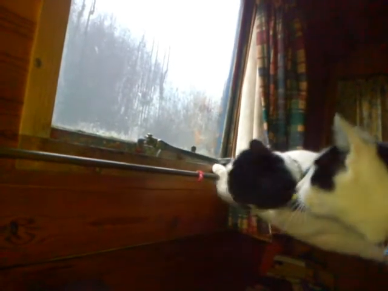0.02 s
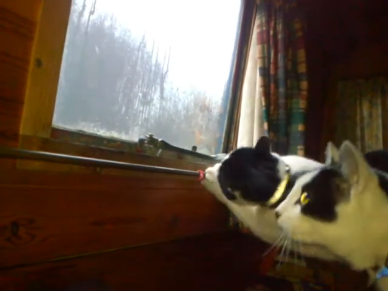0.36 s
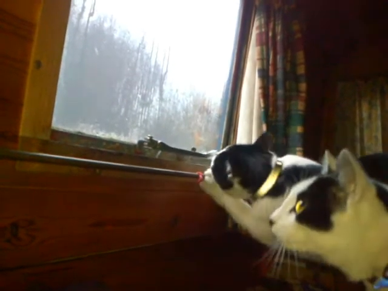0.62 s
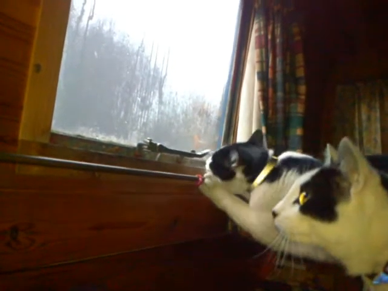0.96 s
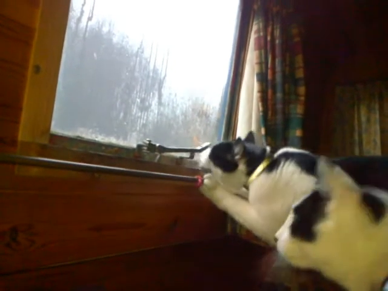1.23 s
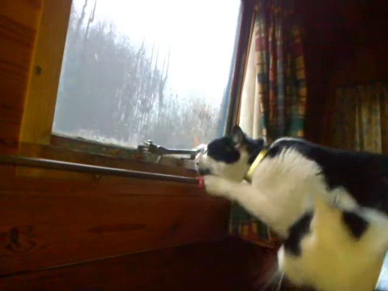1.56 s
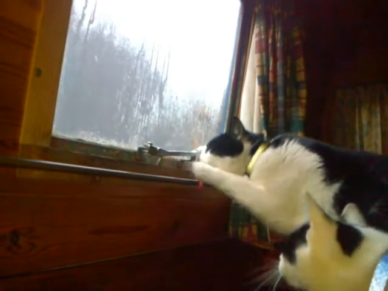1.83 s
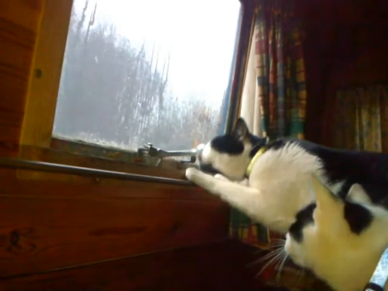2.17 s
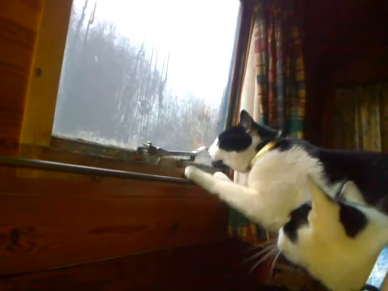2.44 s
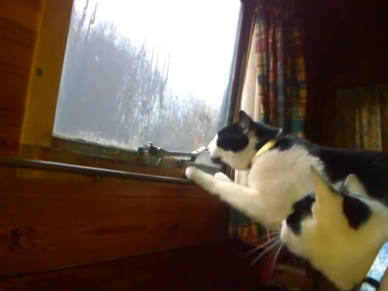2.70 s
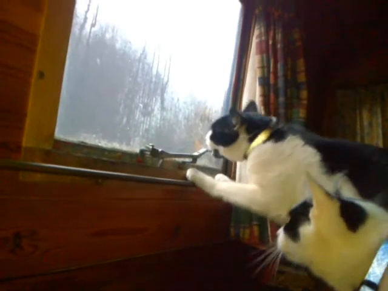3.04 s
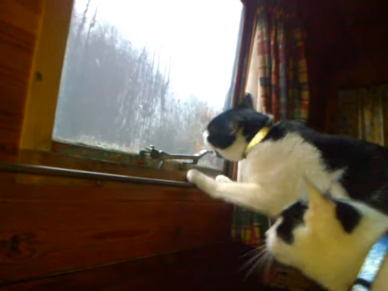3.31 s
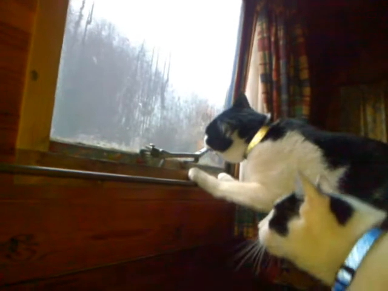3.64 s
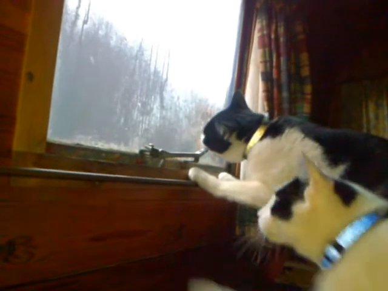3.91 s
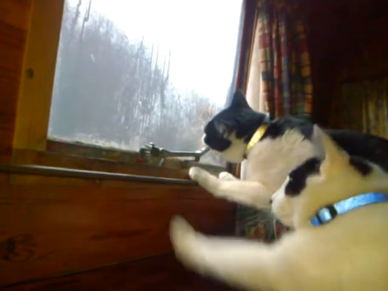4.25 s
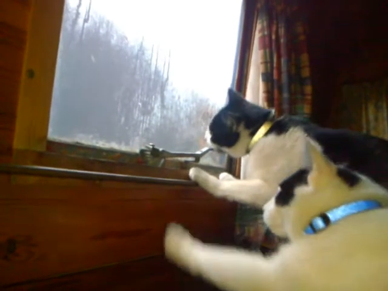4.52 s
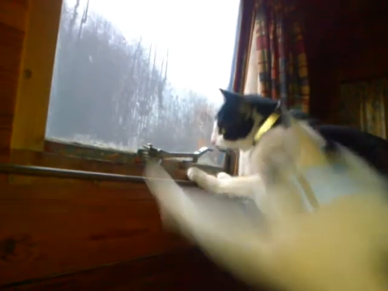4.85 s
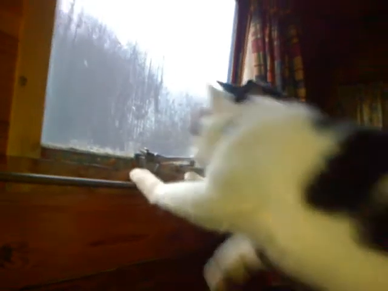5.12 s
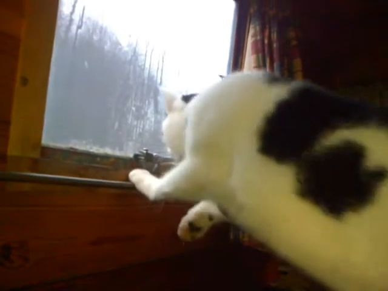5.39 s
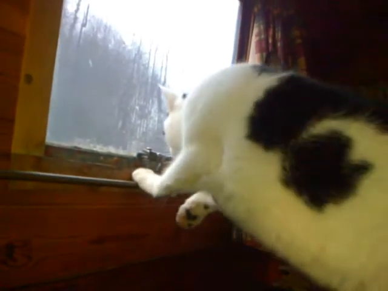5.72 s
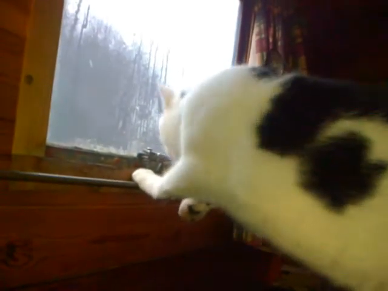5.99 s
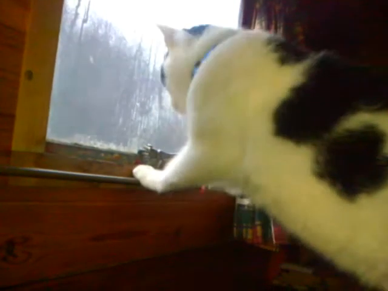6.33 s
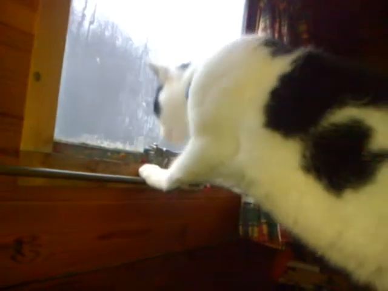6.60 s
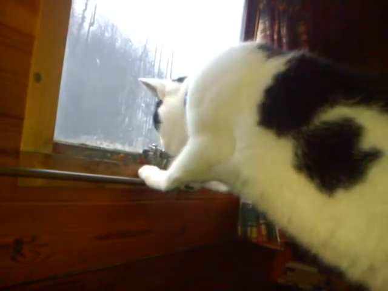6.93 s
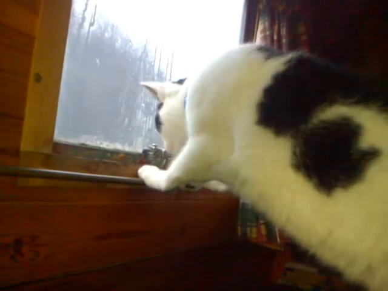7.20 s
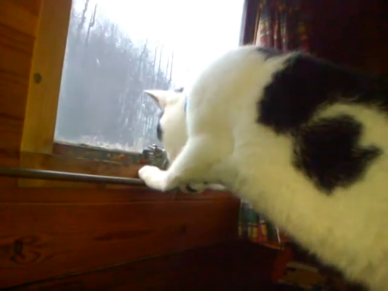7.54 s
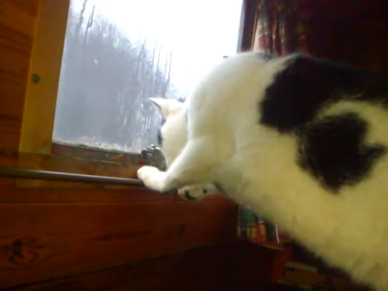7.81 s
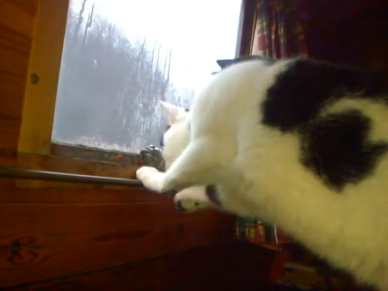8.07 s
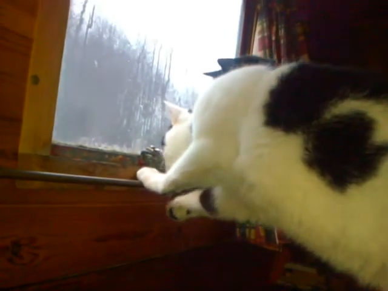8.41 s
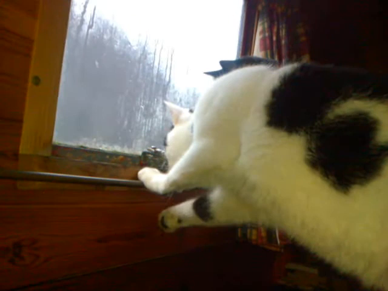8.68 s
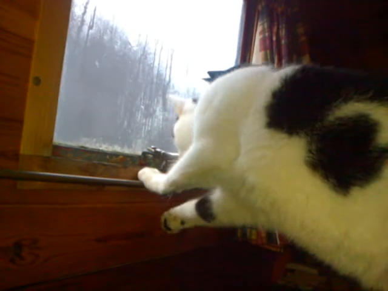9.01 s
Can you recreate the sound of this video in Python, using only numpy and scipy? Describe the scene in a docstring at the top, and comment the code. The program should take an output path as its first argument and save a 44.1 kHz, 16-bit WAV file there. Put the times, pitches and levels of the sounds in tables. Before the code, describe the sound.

Over the faint hiss and rumble of a small mono microphone, a metal window latch lifts, scrapes and drops on its peg several times as a cat paws it. The hardest clack crackles slightly. In a quieter stretch, paws bump the wooden sill and fur brushes the frame. Then the latch clatters once more with a dull wooden knock, followed by faint ticks. The room is small, with little echo.

```python
"""The metal stay of a wooden window, pawed by a cat in a small room.
The arm scrapes, lifts and clacks back on its peg, ringing latch, frame and pane; paws bump the sill.
Each blow is decaying sine modes plus noise bands; scrapes drive the same window with tiny slips.
The cat rustles as it shifts, and its fur brushes the frame once.
A small mono camera adds hiss and rumble; its gain sinks slowly after loud clacks, then recovers."""
import sys
import numpy as np
from scipy import signal
from scipy.fft import rfft, irfft
from scipy.io import wavfile
from scipy.ndimage import uniform_filter1d

SR = 44100
rng = np.random.default_rng(int(sys.argv[2]) if len(sys.argv) > 2 else 0)


def dump_mix(stems):
    """Bounce the given channels to the path in sys.argv[1] as a 16-bit WAV at rate SR."""
    frames = np.atleast_2d(stems).T  # one column per channel
    limited = np.clip(frames, -1, 1)  # hard clip at full scale
    pcm = np.round(limited * 32767).astype(np.int16)
    wavfile.write(sys.argv[1], SR, pcm)


N = 403515

# Noise spectra. Each row: frequency in Hz, relative density in dB.
HISS_SPECTRUM = [(20, -18), (100, -8), (230, -9), (800, -15.5), (1600, -20), (2800, -21.5), (3900, -19),
                 (5600, -19), (8000, -16), (11000, -13), (13500, -11.5), (15500, -12)]
RUMBLE_SPECTRUM = [(8, -9.5), (27, -1), (42, -4.5), (62, 1), (80, -9.5), (130, -10.5), (300, -50),
                   (1000, -70)]
RUSTLE_SPECTRUM = [(40, -1), (110, -4), (240, 2.5), (450, -2.5), (1200, -12), (3000, -16), (8000, -36)]
FUR_SPECTRUM = [(100, -26), (2800, -12), (4200, 6), (5200, 7), (7000, -12), (12000, -18)]
# The cat shifts, the camera follows. Each row: centre and half length in seconds, rustle and rumble in dB.
CAT_SHIFTS = [(0.497, 0.06, -51, -58), (2.75, 0.28, -56.5, -56), (4.3, 0.56, -60.5, -49.5),
              (4.97, 0.25, -50.5, -48), (6.3, 0.37, -61, -55), (6.75, 0.19, -52.5, -59),
              (7.85, 0.15, -57, -46)]
# Arm drops on its peg. Each row: start in seconds, level in dB, ring-time factor (small if held down),
# frame thud in dB, frequency favoured by the contact spot in Hz, first rebound gap in seconds,
# change per rebound in dB.
ARM_CLACKS = [(0.9233, -9.5, 0.66, -1.5, 920, 0.0041, -7), (1.3737, -33, 0.91, 9.5, 1390, .008, -4.5),
              (1.4025, -18.5, 0.67, -9, 2770, 0.0076, -13), (1.665, -19.5, 0.84, 2.5, 644, 0.012, -4),
              (1.795, -18, 0.77, -2, 1110, 0.011, -18), (1.942, -21, 0.99, 3, 4360, .011, -11.5),
              (2.3838, -3.5, 0.94, -3, 5100, 0.0076, -13), (2.4129, -8, 0.88, 2, 5000, .0105, -15),
              (2.432, -13.5, 0.89, 1.5, 616, .013, -6), (7.65, -30, 1.8, 2, 1430, .016, -5),
              (7.6695, -12.5, 1.26, 5, 1520, .003, -12), (7.6923, -4.5, 0.61, 6, 1620, 0.0064, -8),
              (8.5463, -31.5, 0.54, 11, 1300, 0.0073, -20)]
# Modes of latch, frame and pane. Each row: frequency in Hz, relative level in dB, T60 in seconds.
WINDOW_MODES = [(142, -14, .18), (180, -10, .19), (288, -8, .19), (420, -12, .14), (612, -7, .2),
                (660, -6, .16), (762, -5, .17), (875, -4, .16), (1005, -6, .13), (1104, -4, .17),
                (1185, -4, .13), (1263, -5, .15), (1392, -6, .15), (1500, -8, .14), (1540, -7, .14),
                (1582, -6, .13), (1815, -3, .11), (1912, -2, .12), (1945, -3, .1), (2097, -8, .11),
                (2830, -3, .055), (3420, -3, .055), (3840, 1, .065), (4030, -2, .06), (4198, -3, .085),
                (4505, -4, .07), (4605, -3, .07), (5000, -4, .05), (5361, -7, .1), (6700, -9, .045)]
# Dense short-lived modes, as noise bands. Each row: centre in Hz, relative level in dB, T60 in seconds.
CRACK_BANDS = [(99, -14, 0.15), (206, -7, 0.17), (356, -11.5, 0.24), (490, -10, 0.17), (840, -5.5, 0.11),
               (1180, -4, 0.056), (1760, -2.5, 0.039), (2250, -14.5, 0.18), (3270, -7, 0.092),
               (3700, -2.5, 0.073), (4900, -5.5, 0.049), (7250, -7, 0.1), (8240, -11.5, 0.27),
               (14800, -7, .02)]
# Dull sash knocks; light touches on metal.
# Each row: start in seconds, level in dB, frequency in Hz, T60 in seconds.
SASH_THUMPS = [(0.929, -19.5, 287, 0.15), (2.412, -17, 141, 0.084), (4.496, -37.5, 176, 0.16),
               (4.723, -38, 407, 0.054), (5.021, -36, 207, 0.15), (7.7077, -11, 233, 0.084)]
METAL_TINKS = [(2.4135, -32, 10240, 0.12), (6.703, -38.5, 6500, .04), (9.025, -37.5, 3870, 0.079)]
# Arm drags on its peg. Each row: start in seconds, length in seconds, level in dB.
ARM_SCRAPES = [(1.134, 0.022, -41.5), (1.176, 0.046, -47.5), (1.223, 0.029, -44), (2.184, 0.017, -41.5),
               (2.206, 0.023, -39.5)]
# Paws on sill and arm. Each row: start in seconds, level in dB, favoured frequency in Hz.
PAW_BUMPS = [(2.32, -38, 1500), (2.975, -36, 970), (3.166, -39, 1500), (4.493, -35.5, 3600),
             (4.72, -43.5, 460), (4.85, -40.5, 1400), (4.98, -34.5, 620), (5.016, -33.5, 1400),
             (7.383, -39.5, 700)]
# Sill, ceiling and wall reflections. Each row: delay in seconds, linear gain.
REFLECTIONS = [(.0046, 0.14), (.0112, 0.19), (0.0179, .14)]
# Room decay. Each row: band centre in Hz, T60 in seconds.
ROOM_DECAY = [(120, 0.56), (300, 0.47), (1000, 0.25), (4000, 0.11), (12000, 0.45)]

BAND_LIMIT_HZ = 15920
TIME_S = np.arange(N) / SR
AGE_S = np.arange(SR // 3) / SR  # time since a blow


def amp(db):
    """Decibels to gain."""
    return 10 ** (np.asarray(db) / 20)


def unit_rms(x):
    """Scale to RMS 1."""
    return x / np.sqrt(np.mean(x ** 2) + 1e-20)


def decay(t60_s, age_s=AGE_S):
    """Exponential fall, 60 dB per t60_s."""
    return np.exp(-np.log(1000) * age_s / t60_s)


def log_interp(points, hz):
    """Interpolate on a log-frequency axis."""
    points_hz, values = np.transpose(points)
    return np.interp(np.log(hz + 1), np.log(points_hz + 1), values)


def add(mix, start_s, sound):
    """Mix a sound in at start_s."""
    part = mix[round(start_s * SR):][:len(sound)]
    part += sound[:len(part)]


def noise(spectrum):
    """Steady coloured noise, RMS 1."""
    gain = amp(log_interp(spectrum, np.fft.rfftfreq(N, 1 / SR)))
    return unit_rms(irfft(rfft(rng.standard_normal(N)) * gain, N))


def noise_bands(samples, centres_hz):
    """White noise split into overlapping bands."""
    hz = np.fft.rfftfreq(samples, 1 / SR)
    shares = [log_interp(np.column_stack([centres_hz, row]), hz) for row in np.eye(len(centres_hz))]
    return irfft(rfft(rng.standard_normal(samples)) * np.array(shares), samples)


def hiss(level_db=-40.5):
    """Bright, steady camera hiss."""
    return amp(level_db) * noise(HISS_SPECTRUM)


def rumble_and_rustle(rumble_floor_db=-53, rustle_floor_db=-63.5):
    """Camera handling rumble and cat rustle; both swell as the cat shifts its weight."""
    centre_s, half_s, rustle_db, rumble_db = np.transpose(CAT_SHIFTS)
    swells = np.exp(-((TIME_S - centre_s[:, None]) / half_s[:, None]) ** 2)
    rumble_gain = np.hypot(amp(rumble_floor_db), amp(rumble_db) @ swells)
    rustle_gain = np.hypot(amp(rustle_floor_db), amp(rustle_db) @ swells)
    return rumble_gain * noise(RUMBLE_SPECTRUM) + rustle_gain * noise(RUSTLE_SPECTRUM)


def contact_gain(hz, thud_db, thud_hz, clank_db, hard_hz, spot_hz, spot_db):
    """Heavy blows move the frame, hard ones the metal; the contact spot favours one band of modes."""
    frame_db = thud_db * np.exp(-(np.log2(hz / thud_hz) / 0.6) ** 2)
    favoured_db = spot_db * np.exp(-(np.log2(hz / spot_hz) / 0.24) ** 2)
    metal_db = clank_db / (1 + (2700 / hz) ** 4)
    lowpass = 1 / np.hypot(1, (hz / hard_hz) ** 3.53)  # soft contact loses treble
    treble_floor = 0.16 * hard_hz / BAND_LIMIT_HZ
    return amp(frame_db + favoured_db + metal_db) * (lowpass + treble_floor)


def blow(level_db, sustain, **contact):
    """One contact: a few ms of chatter, then dying modes; low modes swing up more slowly."""
    def envelope(hz, t60_s):
        """Rise and decay per mode."""
        rise_s = 0.0007 + 0.9 / hz[:, None]
        return (1 - np.exp(-AGE_S / rise_s)) * decay(sustain * t60_s[:, None])

    hz, db, t60_s = np.transpose(WINDOW_MODES)
    gains = amp(db + 2 * rng.standard_normal(len(hz))) * contact_gain(hz, **contact)
    sines = np.sin(2 * np.pi * (hz[:, None] * AGE_S + rng.random((len(hz), 1))))
    ring = gains @ (envelope(hz, t60_s) * sines)

    hz, db, t60_s = np.transpose(CRACK_BANDS)
    chatter = 1 + 1.9 * np.exp(-(AGE_S / 0.005) ** 2)
    shape = envelope(hz, t60_s) * chatter
    bands = noise_bands(len(AGE_S), hz) * shape
    bands *= (np.linalg.norm(shape, axis=1) / np.linalg.norm(bands, axis=1))[:, None]  # set band energy
    crack = (amp(db) * contact_gain(hz, **contact)) @ bands
    return amp(level_db - 12.5) * (ring + reflect(crack))


def reflect(x):
    """Near surfaces repeat a sharp sound."""
    out = x.copy()
    for delay_s, gain in REFLECTIONS:
        add(out, delay_s, gain * x)
    return out


def clacks(contacts=3, gap_ratio=0.9, arm_hz=4270, arm_db=9.5):
    """The arm strikes and rebounds, ever sooner and weaker; stronger contacts are harder and clank more."""
    out = np.zeros(N)
    for start_s, db, sustain, thud_db, spot_hz, gap_s, rebound_db in ARM_CLACKS:
        spot_db = 6.5
        for k in range(contacts):
            hard_hz = 5600 * 2 ** (db / 30.5)
            clack = blow(db, sustain, thud_db=thud_db, thud_hz=325, clank_db=2.5 + 0.15 * db,
                         hard_hz=hard_hz, spot_hz=spot_hz, spot_db=spot_db)
            add(out, start_s, clack)
            start_s += gap_s * gap_ratio ** k
            db += rebound_db
            thud_db += 3  # rebounds lean more on the frame
            spot_hz, spot_db = arm_hz, arm_db  # and ring the arm itself
    return out


def thumps_and_tinks(rise_cycles=0.34):
    """Sash wood or metal swings up and rings in a single mode."""
    out = np.zeros(N)
    for start_s, db, hz, t60_s in SASH_THUMPS + METAL_TINKS:
        envelope = (1 - np.exp(-AGE_S * hz / rise_cycles)) * decay(t60_s)
        add(out, start_s, amp(db) * envelope * np.sin(2 * np.pi * hz * AGE_S))
    return out


def scrapes(slips_per_s=700, squeak_hz=1950):
    """Tiny slips shake the window, favouring one squeaky note of the arm."""
    out = np.zeros(N)
    for start_s, length_s, db in ARM_SCRAPES:
        slips = rng.standard_normal(len(AGE_S))
        slips *= (rng.random(len(AGE_S)) < slips_per_s / SR) & (AGE_S < length_s)
        response = blow(0, sustain=1, thud_db=5, thud_hz=230, clank_db=-4,
                        hard_hz=1900, spot_hz=squeak_hz, spot_db=9)
        scrape = unit_rms(signal.fftconvolve(slips, response))
        add(out, start_s, amp(db) * np.sqrt(length_s * SR / len(scrape)) * scrape)
    return out


def paw_bumps():
    """A soft paw moves the frame and hardly rings the metal."""
    out = np.zeros(N)
    for start_s, db, spot_hz in PAW_BUMPS:
        bump = blow(db, sustain=0.58, thud_db=15, thud_hz=334, clank_db=-13,
                    hard_hz=1670, spot_hz=spot_hz, spot_db=8)
        add(out, start_s, bump)
    return out


def overload_crackle(start_s=2.3849, level_db=-16, t60_s=0.038, highpass_hz=9300):
    """A brief bright crackle as the hardest clack overloads the microphone."""
    out = np.zeros(N)
    highpass = signal.butter(2, highpass_hz, "high", fs=SR, output="sos")
    bright = unit_rms(signal.sosfilt(highpass, rng.standard_normal(len(AGE_S))))
    add(out, start_s, amp(level_db) * bright * decay(t60_s))
    return out


def fur_brush(start_s=6.6, length_s=0.38, ramp_s=0.084, level_db=-55):
    """Fur slides past the frame: a soft, high swish."""
    inside_s = np.minimum(TIME_S - start_s, start_s + length_s - TIME_S)
    return amp(level_db) * np.clip(inside_s / ramp_s, 0, 1) * noise(FUR_SPECTRUM)


def room(x, tail_db=-18, onset_s=0.014):
    """The small curtained room adds a short tail."""
    hz, t60_s = np.transpose(ROOM_DECAY)
    age_s = np.arange(SR // 2) / SR
    tail = (noise_bands(len(age_s), hz) * decay(t60_s[:, None], age_s)).sum(0)
    tail *= np.minimum(age_s / onset_s, 1) ** 2
    return x + amp(tail_db) * signal.fftconvolve(x, tail / np.linalg.norm(tail))[:N]


def scene():
    """Window, room and noises at one microphone, on two equal channels."""
    events = clacks() + paw_bumps() + overload_crackle() + scrapes() + thumps_and_tinks()
    mono = room(events) + hiss() + rumble_and_rustle() + fur_brush()
    return np.array([mono, mono])


def auto_gain(x, threshold_db=-30, hold_s=1.03, sink_db_per_s=3.0, recover_db_per_s=19, block=256):
    """After a loud sound the gain sinks for the hold time, then climbs back."""
    loud = uniform_filter1d(x ** 2, block)[::block] > amp(threshold_db) ** 2
    block_s = TIME_S[::block]
    last_loud_s = np.maximum.accumulate(np.where(loud, block_s, -np.inf))
    slope_db_per_s = np.where(block_s - last_loud_s < hold_s, -sink_db_per_s, recover_db_per_s)
    travel_db = np.cumsum(slope_db_per_s) * block / SR
    gain_db = travel_db - np.maximum.accumulate(travel_db)  # never above full gain
    return amp(np.interp(TIME_S, block_s, gain_db))


def record(dry, ceiling=0.94):
    """Slow gain control, soft overload on the hardest clacks, band limit."""
    saturated = ceiling * np.tanh(dry * auto_gain(dry[0]) / ceiling)
    lowpass = signal.firwin(511, BAND_LIMIT_HZ, window=("kaiser", 9), fs=SR)
    return signal.oaconvolve(saturated, lowpass[None], "same")


dry = scene()
out = record(dry)
dump_mix(out)
```